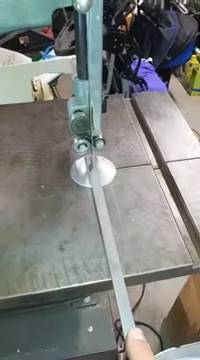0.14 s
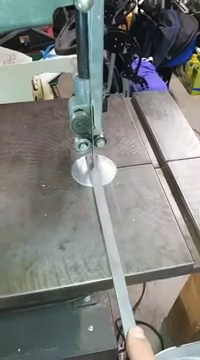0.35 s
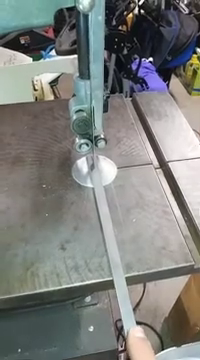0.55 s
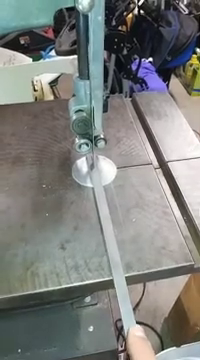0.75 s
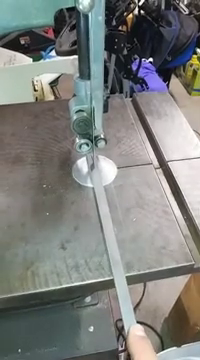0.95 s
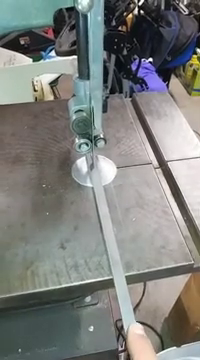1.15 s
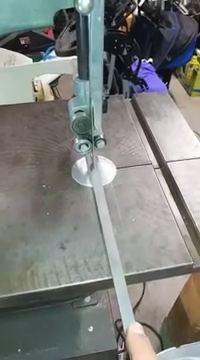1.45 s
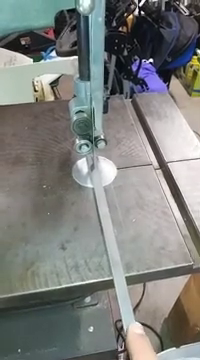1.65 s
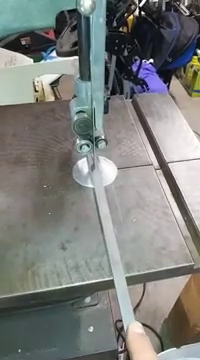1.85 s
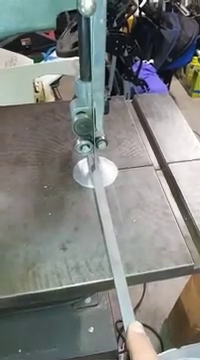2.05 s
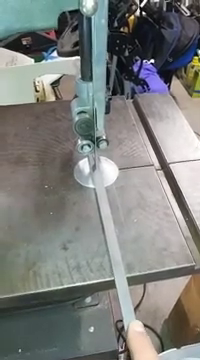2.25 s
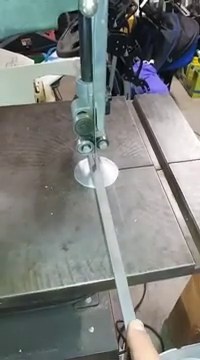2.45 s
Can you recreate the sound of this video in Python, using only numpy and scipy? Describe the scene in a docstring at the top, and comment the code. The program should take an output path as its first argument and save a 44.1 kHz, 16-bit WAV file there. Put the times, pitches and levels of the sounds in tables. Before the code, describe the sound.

Loud metal-cutting bandsaw up close, rough buzzing roar, wavering metallic whine and bright scraping rasp

```python
"""Bandsaw cutting a steel bar

A bandsaw cuts steel close by in a small workshop. Blade and bar sing near the tooth rate in a wandering
whine and a tone about an octave up, with weaker wavering tones beside them. Noise drives the ring of
bar, blade and table; noise pulsed by the teeth makes the roar, the harsh rasp of chips and bright tooth
rings. The motor hums below on two tones. A fast limiter in each channel holds the loud sound down."""
import sys
import numpy as np
from scipy import signal
from scipy.fft import rfft, irfft
from scipy.io import wavfile
from scipy.ndimage import uniform_filter1d, minimum_filter1d

SR = 44100
rng = np.random.default_rng(int(sys.argv[2]) if len(sys.argv) > 2 else 0)


def digitize_waveform(pressure):
    """Quantize a signal to 16-bit integers and store it at the path in sys.argv[1].

    Rows of a 2-D input are taken as channels; values are limited to [-1, 1].
    """
    field = np.atleast_2d(pressure).T
    bounded = np.clip(field, -1, 1)
    quanta = np.round(bounded * 32767).astype(np.int16)
    wavfile.write(sys.argv[1], SR, quanta)


N = 114660

# bite of the teeth over time, scaled per layer: start_s, relative level_db
BITE = [(0.0, -22), (0.03, -14), (0.06, -22.5), (0.1, -21), (0.38, -19), (0.44, -28.5), (0.47, -15.5),
        (0.53, -26), (0.57, -15.5), (0.59, -27), (0.6, -20), (0.63, -29), (0.69, -21), (0.77, -28),
        (0.8, -22.5), (0.94, -26.5), (0.96, -23.5), (1.01, -31.5), (1.08, -26.5), (1.11, -17.5),
        (1.12, -26), (1.22, -28.5), (1.24, -18), (1.28, -24), (1.31, -16.5), (1.34, -27.5), (1.35, -16),
        (1.38, -26), (1.38, -25), (1.65, -20.5), (1.69, -23.5), (1.72, -15.5), (1.83, -25), (1.86, -21.5),
        (1.87, -25.5), (1.9, -18.5), (1.97, -24.5), (2.13, -19.5), (2.14, -24), (2.25, -21), (2.27, -17),
        (2.32, -26), (2.35, -14.5), (2.41, -24), (2.43, -18), (2.45, -13), (2.47, -21), (2.6, -20)]


def amp(db):
    """Decibels to gain."""
    return 10 ** (np.asarray(db) / 20)


def unit(x):
    """Scales to rms 1."""
    return x / np.sqrt(np.mean(x ** 2, axis=-1, keepdims=True) + 1e-20)


def curve(table, axis=1):
    """One column of a table, interpolated over time."""
    rows = np.array(table)
    return np.interp(np.arange(N) / SR, rows[:, 0], rows[:, axis])


def level(table, amount=1):
    """A dB curve over time, its swing scaled by amount, as a gain of rms 1."""
    return unit(amp(amount * curve(table)))


def bins():
    """Frequencies of the full-length spectrum, in Hz."""
    return np.fft.rfftfreq(N, 1 / SR)


def spectrum(table):
    """Each column of a table, interpolated over log frequency."""
    f, *columns = np.array(table, float).T
    log_hz = np.log(bins() + 1)
    return np.array([np.interp(log_hz, np.log(f), c) for c in columns])


def colour(x, table):
    """Shapes white sound of rms 1 to the table's density in each channel."""
    return irfft(rfft(x) * amp(spectrum(table)), N) * np.sqrt(SR / 2)


def drift(rate_hz):
    """Smooth random motion of rms 1, with a Gaussian roll-off set by rate_hz."""
    lowpass = np.exp(-(bins() / rate_hz) ** 2) * (bins() > 0)
    return unit(irfft(rfft(rng.standard_normal(N)) * lowpass, N))


def pair(a, b, likeness):
    """Two channels of the given likeness from two unrelated sounds."""
    c = np.clip(likeness, -1, 1)
    return np.array([a, c * a + np.sqrt(1 - c ** 2) * b])


def turning(hz, waver_hz, rate_hz):
    """A rotating phasor whose frequency wavers by waver_hz rms, from a random phase."""
    cycles = np.cumsum(hz + waver_hz * drift(rate_hz)) / SR
    return np.exp(2j * np.pi * (cycles + rng.random()))


def tone(hz, waver_hz, left_db, right_db, lead_rad, likeness):
    """A wavering tone that reaches the two channels with its own level and phase."""
    a = turning(hz, waver_hz, rate_hz=28)
    b = turning(hz, waver_hz, rate_hz=28)
    phasors = pair(a, b, likeness) * np.exp([[1j * lead_rad], [0]])
    return np.sqrt(2) * unit(phasors.real) * amp([[left_db], [right_db]])


def resonate(x, hz, width_hz):
    """Two equal resonances in series, scaled to rms 1; -6 dB at width_hz either side."""
    return unit(irfft(rfft(x) / (1 + 1j * (bins() - hz) / width_hz) ** 2, N))


def patchy(x):
    """Lets narrow parts of the spectrum flare and fade at random."""
    patch_db, patch_hz, patch_s = 2.5, 110, 0.05
    f, t, z = signal.stft(x, SR, nperseg=1024, noverlap=768)
    field = np.fft.fft2(rng.standard_normal((len(f), len(t))))
    across = np.fft.fftfreq(len(f), f[1])[:, None]
    along = np.fft.fftfreq(len(t), t[1])
    smoothing = np.exp(-(across * patch_hz) ** 2 - (along * patch_s) ** 2)
    field = np.fft.ifft2(field * smoothing).real
    flared = z * amp(patch_db * field / field.std())
    return unit(signal.istft(flared, SR, nperseg=1024, noverlap=768)[1][:, :N])


def workshop(x):
    """Adds a short spray of sparse decaying reflections, different in each channel."""
    room_db, t60_s, taps_per_s = -11, 0.1, 2000
    t = np.arange(SR // 4) / SR
    present = rng.random((2, len(t))) < taps_per_s / SR
    taps = rng.standard_normal((2, len(t))) * present * amp(-60 * t / t60_s)
    taps /= np.linalg.norm(taps, axis=1, keepdims=True)
    reflections = signal.fftconvolve(x, taps, axes=1)[:, :N]
    return unit(x + amp(room_db) * reflections)


def motor_hum():
    """The motor hums on two low, wavering tones."""
    # pitch_hz, waver_hz (rms), left_db, right_db, left_lead_rad, likeness
    hum_tones = [(118.8, 3, -44, -45, 0, 0.54), (240.7, 0.48, -42.5, -39.5, 0, 0.92)]
    return sum(tone(*row) for row in hum_tones)


def tooth_strokes():
    """Teeth strike in a wavering cycle that modulates the force on the steel."""
    return 1 + 0.37 * turning(552.5, waver_hz=49.84, rate_hz=78).real


def roar(teeth):
    """Tooth strokes shake the whole saw; its low part swells on its own."""
    # broad roar: freq_hz, relative left_db_per_hz, relative right_db_per_hz
    roar_density = [(20, -69, -60.5), (154, -64, -59.5), (267, -52.5, -57), (457, -60, -43.5),
                    (700, -45.5, -58), (850, -37.5, -46.5), (985, -40, -44), (1160, -50, -48.5),
                    (1440, -46.5, -47.5), (1530, -47, -45), (1840, -56.5, -44.5), (2180, -52, -51.5),
                    (2770, -58, -49.5), (3100, -76, -61), (5000, -110, -110)]
    # channel correlation of the driving force: freq_hz, likeness
    channel_likeness = [(30, .1), (120, .6), (280, 1), (450, 0), (900, 0.64), (2100, 0.56), (2700, -.2)]
    # swell of the low part: start_s, relative level_db
    low_swell = [(0.0, -29), (0.06, -23), (0.54, -26.5), (0.58, -21), (0.62, -27), (2.05, -27),
                 (2.11, -22.5), (2.23, -29), (2.27, -20), (2.35, -28), (2.42, -23.5), (2.45, -28),
                 (2.56, -23), (2.6, -31)]
    flutter = amp(-1 * drift(rate_hz=18))
    force = rfft(unit(rng.standard_normal((2, N)) * teeth * flutter))
    force = irfft(pair(*force, spectrum(channel_likeness)[0]), N)
    shaken = colour(patchy(force), roar_density)
    low = irfft(rfft(shaken) / (1 + (bins() / 480) ** 10), N)  # below about 480 Hz
    upper = shaken - low
    return amp(-0.5) * (level(BITE, amount=0.42) * upper + level(low_swell, amount=0.63) * low)


def ringing():
    """Scraping keeps the steel's modes ringing; each swells and fades on its own."""
    # modes of bar, blade and table: freq_hz, width_hz, relative left_db, relative right_db
    modes = [(312.8, 8.2, -38, -39.5), (356.7, 7.8, -38, -36), (449.3, 17, -31, -37),
             (647.2, 21.5, -26, -37), (731.7, 10.5, -27.5, -30), (870, 34, -40, -26),
             (917, 12.2, -29.5, -24), (966.4, 23, -24, -28.5), (1549, 16, -30.5, -30),
             (1660, 17.6, -27, -28.5), (2020, 19.6, -31, -25), (2122, 55, -30.5, -23.5),
             (3064, 38, -37.5, -35), (4230, 30, -54, -35.5)]
    out = np.zeros((2, N))
    for hz, width_hz, left_db, right_db in modes:
        scrape = pair(*rng.standard_normal((2, N)), likeness=0.66)
        scrape = scrape * amp(2.5 * drift(rate_hz=8.2))
        out += amp([[left_db], [right_db]]) * resonate(scrape, hz, width_hz)
    return amp(2.9) * level(BITE, amount=0.29) * out


def rasp(teeth):
    """Teeth tear off chips of uneven size: bright noise pulsing with the tooth strokes."""
    # freq_hz, relative left_db_per_hz, relative right_db_per_hz
    rasp_density = [(1200, -110, -110), (2300, -82, -60.5), (3080, -60.5, -55.5), (3660, -61.5, -59.5),
                    (4240, -62.5, -58), (5070, -61.5, -54.5), (5350, -55, -53.5), (6100, -66.5, -54.5),
                    (6900, -66.5, -52.5), (7440, -92, -47.5), (7730, -83, -52.5), (8410, -94, -64),
                    (9400, -86.5, -65.5), (11800, -80.5, -64.5), (13500, -92, -71.5), (15000, -88, -80.5)]
    chip_db = 2.0 * drift(rate_hz=800)
    flutter_db = 0.7 * drift(rate_hz=84)
    chips = teeth * amp(chip_db + flutter_db)
    scratches = workshop(rng.standard_normal((2, N)) * chips)
    return amp(2.5) * level(BITE) * colour(scratches, rasp_density)


def tooth_ring(teeth):
    """Teeth that catch in the steel ring in short, bright bursts."""
    # freq_hz, width_hz, left_db, right_db
    bright_rings = [(7350, 230, -53, -20), (7707, 310, -56, -17)]
    catches = teeth * amp(3 * drift(rate_hz=180)) * level(BITE, amount=1)
    out = np.zeros((2, N))
    for hz, width_hz, left_db, right_db in bright_rings:
        bursts = catches * rng.standard_normal((2, N))
        out += amp([[left_db], [right_db]]) * resonate(bursts, hz, width_hz)
    return out


def whine():
    """Blade and bar sing near the tooth rate and about an octave up, each with its own level curve."""
    # singing strength: start_s, relative whine_db, relative octave_db
    singing = [(0.0, -20, -24), (0.03, -15, -21), (0.12, -17, -25), (0.14, -20, -17), (0.25, -11, -22),
               (0.27, -19, -22), (0.45, -13, -16), (0.54, -18, -12), (0.57, -14, -23), (0.63, -14, -14),
               (0.69, -16, -19), (0.72, -18, -11), (0.89, -14, -21), (0.94, -19, -17), (0.98, -9, -16),
               (1.01, -12, -25), (1.05, -9, -19), (1.12, -19, -16), (1.18, -12, -19), (1.51, -14, -21),
               (1.54, -10, -26), (1.59, -14, -17), (1.92, -13, -22), (1.96, -13, -19), (2.05, -21, -13),
               (2.24, -12, -19), (2.3, -21, -14), (2.37, -19, -27), (2.4, -12, -19), (2.43, -16, -25),
               (2.56, -15, -17), (2.6, -24, -16)]
    # start_s, pitch_hz
    whine_pitch = [(0, 560), (.28, 572), (.33, 548), (.42, 570), (.5, 553), (.9, 558), (1.0, 569),
                   (1.22, 571), (1.33, 549), (1.43, 571), (1.52, 554), (1.68, 554), (1.82, 573), (1.9, 552),
                   (1.97, 566), (2.15, 553), (2.4, 573), (2.6, 562)]
    # start_s, pitch_hz
    octave_pitch = [(0, 1120), (.3, 1118), (.39, 1140), (.5, 1116), (1.22, 1119), (1.3, 1088), (1.62, 1117),
                    (2.08, 1118), (2.3, 1109), (2.6, 1121)]
    # weaker tones: pitch_hz, waver_hz (rms), relative left_db, relative right_db, left_lead_rad, likeness
    side_tones = [(528, 4, -20.5, -28, 2.4, .8), (553, 9, -23, -22, -1.8, .5), (586, 6, -23, -28, 1.6, .8),
                  (1087, 16, -24, -25, 1.2, .4), (1146, 14, -25, -26, 1.5, .85)]
    low = tone(curve(whine_pitch), waver_hz=3.37, left_db=-1.85, right_db=0, lead_rad=1, likeness=0.79)
    high = tone(curve(octave_pitch), waver_hz=5.97, left_db=-4, right_db=0, lead_rad=-0.23, likeness=1)
    beside = amp(1.0) * sum(tone(*row) for row in side_tones)
    low_gain = amp(2.5 + curve(singing, axis=1))
    high_gain = amp(1.5 + curve(singing, axis=2))
    return low_gain * low + high_gain * high + beside


def scene():
    """The motor and the cut; roar, rasp and tooth ring share the same tooth strokes."""
    teeth = tooth_strokes()
    return motor_hum() + roar(teeth) + ringing() + rasp(teeth) + tooth_ring(teeth) + whine()


def record(dry):
    """A fast look-ahead peak limiter in each channel, then a low-pass."""
    ceiling, lookahead_s, recover_db_per_s, edge_hz = 0.91, 0.00098, 368, 15400
    span = 2 * int(lookahead_s * SR) + 1
    need_db = -20 * np.log10(np.maximum(abs(dry) / ceiling, 1))
    need_db = minimum_filter1d(need_db, span, axis=1)
    recovery_db = np.arange(N) / SR * recover_db_per_s
    # gain drops at once and recovers at a fixed slope
    gain_db = np.minimum.accumulate(need_db - recovery_db, axis=1) + recovery_db
    limited = dry * amp(uniform_filter1d(gain_db, span, axis=1))
    lowpass = signal.firwin(511, edge_hz, window=("kaiser", 9), fs=SR)
    return signal.oaconvolve(limited, lowpass[None], "same")


dry = scene()
out = record(dry)
digitize_waveform(out)
```